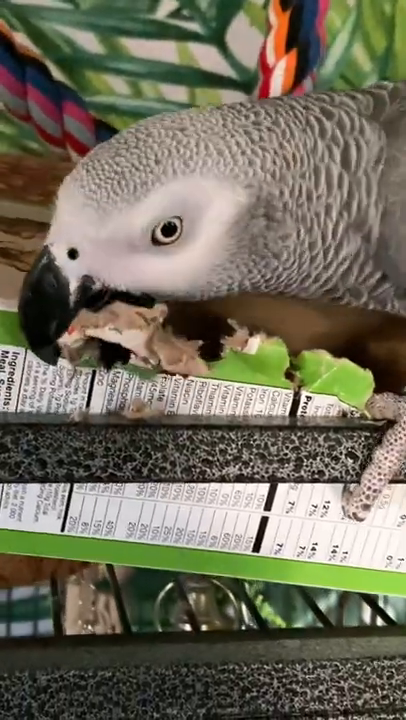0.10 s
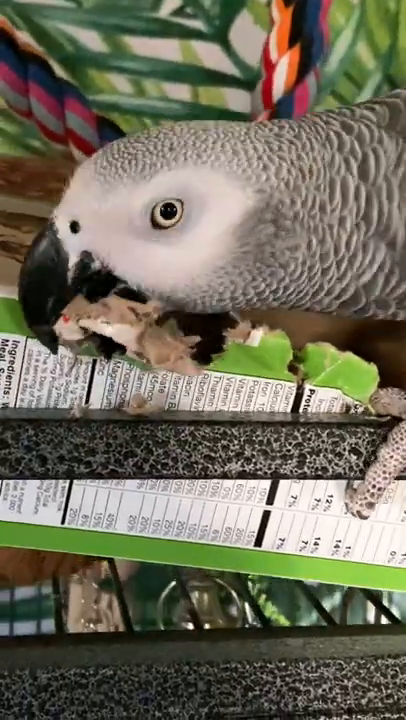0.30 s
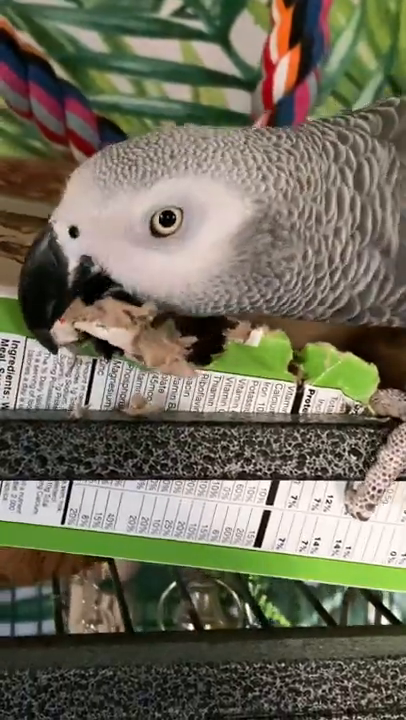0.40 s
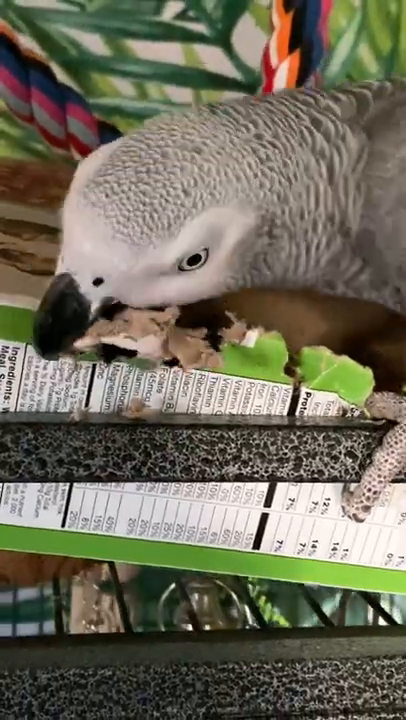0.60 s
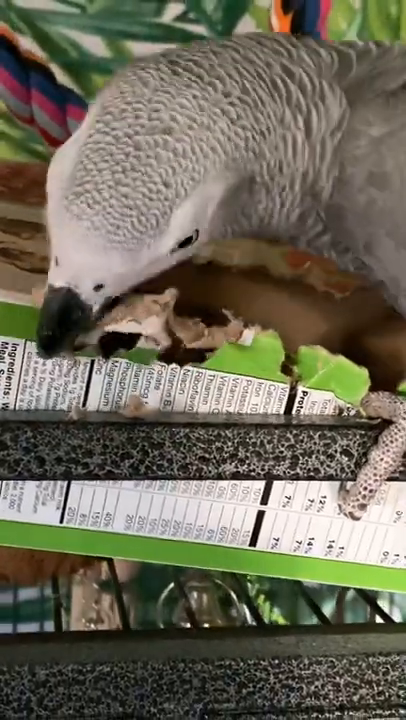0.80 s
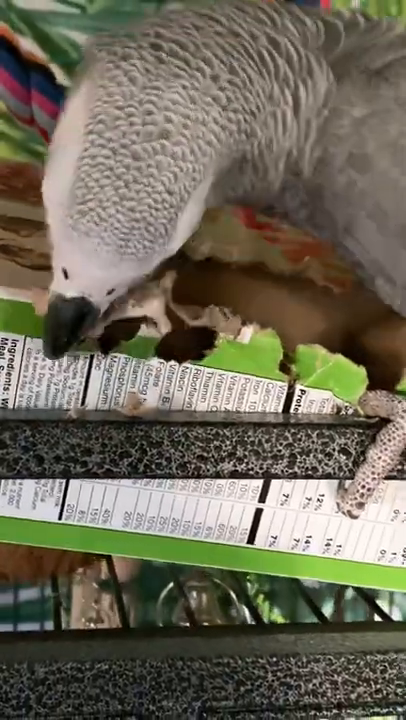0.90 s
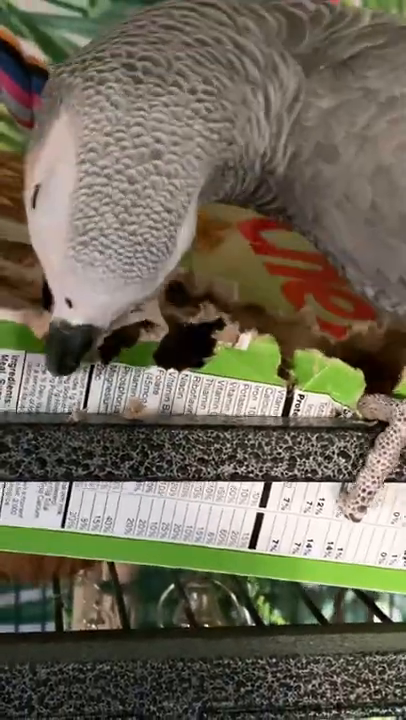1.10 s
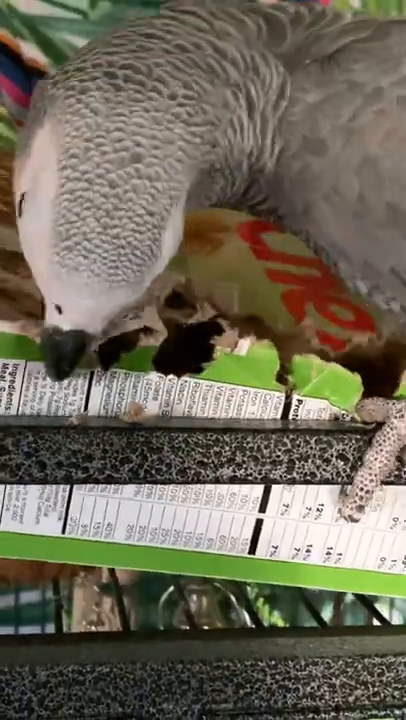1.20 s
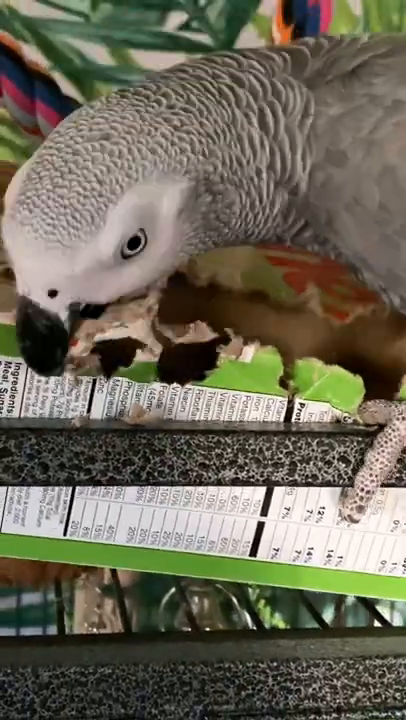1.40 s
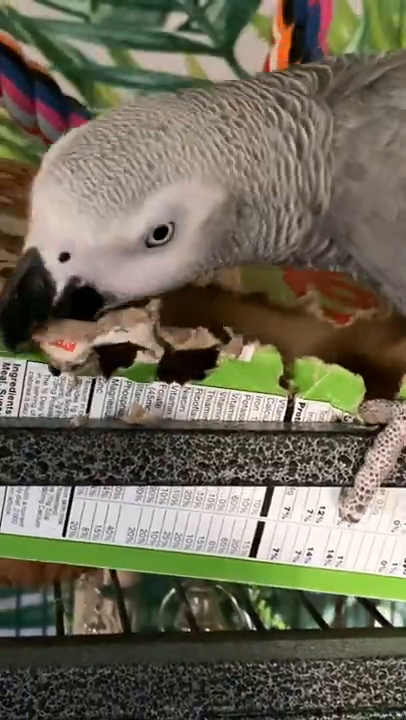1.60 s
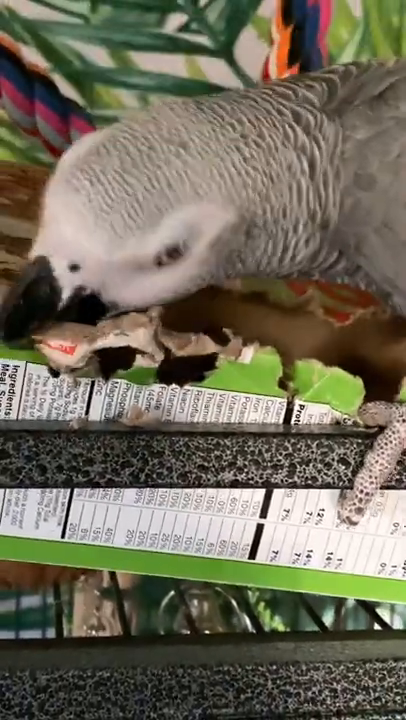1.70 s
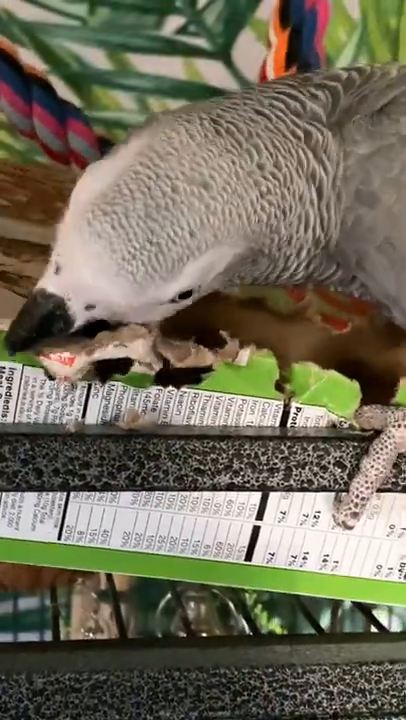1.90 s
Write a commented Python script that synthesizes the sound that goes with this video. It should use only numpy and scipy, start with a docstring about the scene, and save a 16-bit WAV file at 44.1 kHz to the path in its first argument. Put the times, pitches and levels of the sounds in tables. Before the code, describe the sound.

Two sharp parrot whistles sweep up and drop, while another bird squawks farther off.

```python
"""A parrot whistles, another bird squawks

A parrot whistles twice in a live room: a low held note swoops up three octaves, hovers, drops loudly.
Between and after the whistles another bird, farther off, squawks harshly.
A soft chirp leads into the first squawk. A beak nibbles faintly at cardboard, snapping its fibres.
Underneath are a low room rumble, a hum and a faint ring that dies away at the start."""
import sys
import numpy as np
from scipy import signal
from scipy.fft import rfft, irfft
from scipy.io import wavfile
from scipy.ndimage import uniform_filter1d, minimum_filter1d

SR = 44100
rng = np.random.default_rng(int(sys.argv[2]) if len(sys.argv) > 2 else 0)


def int16_out(signal):
    """Quantize to a 16-bit WAV file."""
    q = np.round(np.clip(np.atleast_2d(signal).T, -1, 1) * 32767)
    wavfile.write(sys.argv[1], SR, q.astype(np.int16))


N = 83790
T = np.arange(N) / SR
CUTOFF_HZ = 15850


def from_db(db):
    """Turn decibels into a number to multiply by."""
    return 10 ** (np.asarray(db) / 20)


def unit_power(x):
    """Scale a sound so its average power is 1."""
    return x / np.sqrt(np.mean(x ** 2) + 1e-20)


def at_hz(points, hz):
    """Look up a table by frequency, giving every octave equal space."""
    freqs, values = np.transpose(points)
    return np.interp(np.log(np.maximum(hz, 1)), np.log(freqs), values)


def colour(x, spectrum):
    """Give a sound the tone of a (frequency, level) table, at power 1."""
    gains = from_db(at_hz(spectrum, np.fft.rfftfreq(N, 1 / SR)))
    return unit_power(irfft(rfft(x) * gains, N))


def drift(hz):
    """A smooth random wobble of typical size 1; higher hz wobbles faster."""
    pole = np.exp(-2 * np.pi * hz / SR)
    return unit_power(signal.lfilter([1], [1, -2 * pole, pole * pole], rng.standard_normal(2 * N))[N:])


def phase_of(hz):
    """Add up a changing pitch into the angle of its wave."""
    return 2 * np.pi * np.cumsum(hz) / SR


# Tone of the room's rumble: (frequency [Hz], level [dB])
RUMBLE_TONE = [(20, -9.5), (32, -11), (48, 0.5), (70, -7), (120, -8), (200, -15), (400, -15), (1000, -27.5),
               (2500, -34.5), (6000, -37.5), (12000, -38.5), (16000, -28.5)]
def rumble(level_db=-61.5):
    """Steady, deep noise in the room."""
    return from_db(level_db) * colour(rng.standard_normal(N), RUMBLE_TONE)


# How the hum swells and sinks: (time [s], level [dB])
HUM_LEVELS = [(0, -58.5), (.1, -64), (.22, -52.5), (.33, -65), (1.3, -73), (1.68, -63.5), (1.9, -66)]
def hum(hz=99, waver_hz=3):
    """One low note that wavers slowly."""
    level = from_db(np.interp(T, *np.transpose(HUM_LEVELS)))
    return level * np.sin(phase_of(hz + waver_hz * drift(6.3)))


# Tone of the opening ring: (frequency [Hz], level [dB])
RING_TONE = [(400, -25), (800, 4.5), (1200, 1.5), (1650, 11.5), (2300, 6.5), (3200, -1.5), (5000, -13),
             (12000, -37)]
def dying_ring(start_db=-61, fall_db_per_s=45.5):
    """A faint, noisy ring dies away in the room."""
    return from_db(start_db - fall_db_per_s * T) * colour(rng.standard_normal(N), RING_TONE)


def overtone(phase, multiple):
    """A higher copy of a note, made hoarse by a fast wobble."""
    return np.sin(multiple * phase + 0.8 * drift(400))


# The whistle's swoop up and down; roughness 0 is smooth:
# (time from the top [s], pitch [Hz], level [dB], roughness [factor], overtone level [dB])
SWOOP_PATH = [(-.131, 735, -41, .5, -27), (-.120, 980, -21.5, .6, -34.5), (-.108, 1500, -27.5, .5, -39),
              (-.094, 2300, -31.5, .2, -35.5), (-.081, 3030, -18.5, .2, -34),
              (-.074, 3450, -11.5, .2, -19.5), (-.064, 4028, -10.5, .5, -34.5),
              (-.055, 5000, -14.5, 1.11, -11), (-.040, 5450, -8, .4, -4.5), (-.031, 5570, -8, .25, -22.5),
              (-.021, 5400, -5.5, .25, -26.5), (-.012, 5700, -9, 0.22, -22), (-.003, 5750, -4.5, .2, -40),
              (.003, 5532, -0.5, 0.02, -16.5), (0.014, 4942, -1, .1, -24.5), (0.021, 4242, -2, 0.2, -23),
              (0.032, 3695, -9, 0.3, -15.5), (.043, 3240, -15, 0.3, -33.5),
              (0.054, 3117, -44.5, 0.1, -33.5)]
def whistle_note(from_top, lead_age, lead_s, tuning):
    """A nearly pure tone: a swelling low lead-in, then the swoop, roughest as it nears the top."""
    fade_s, shimmer_db, jitter = 0.0026, 4, 0.042
    times, *columns = np.transpose(SWOOP_PATH)
    swoop_hz, db, rough, overtone_db = (np.interp(from_top, times, column) for column in columns)
    swoop_in = np.clip((from_top - times[0]) / fade_s, 0, 1)
    swoop_out = np.clip((times[-1] - from_top) / fade_s, 0, 1)
    swoop_level = from_db(db + shimmer_db * rough * drift(450)) * swoop_in * swoop_out
    lead_level = from_db(np.interp(lead_age, [0, lead_s], [-40.5, -22.5]))
    lead_level *= np.minimum(lead_age / fade_s, 1) * (1 - swoop_in)
    lead_hz = 741 + (590 - 741) * np.exp(-lead_age / 0.016)  # slides up, then holds
    hz = tuning * np.where(from_top < times[0], lead_hz, swoop_hz)
    phase = phase_of(hz * (1 + jitter * rough * drift(450)))
    second = overtone(phase, 2)
    third = from_db(1.8 * db) * overtone(phase, 3)  # flares as the whistle gets louder
    lead = np.sin(phase) + from_db(-30) * overtone(phase, 5)
    swoop = np.sin(phase) + from_db(overtone_db) * (second + third)
    return np.sqrt(2) * (lead_level * lead + swoop_level * swoop)


# Tone of the whistle's breath: (frequency [Hz], level [dB])
BREATH_TONE = [(250, -17.5), (600, -10.5), (2500, -17.5), (3600, -21), (5000, -10.5), (6300, -1.5),
               (8300, -18.5), (10200, 1.5), (12300, -21.5), (14300, -4), (16000, -19.5)]
def breath(lead_age, length_s=0.1):
    """Air rushes along with the lead-in and the start of the climb."""
    swell = np.sin(np.pi * np.minimum(lead_age / length_s, 1))
    return from_db(-43.5) * swell * colour(rng.standard_normal(N), BREATH_TONE)


# Tone of the low puff and the overload hiss above it: (frequency [Hz], level [dB])
PUFF_AND_SPLATTER_TONE = [(100, -19), (200, 5.5), (450, 2), (1000, -2.5), (3000, 3), (6500, -13),
                          (9000, -5), (12500, -8), (15500, 10)]
def puff_and_splatter(from_top, delay_s=0.012, width_s=0.017):
    """A low puff and a splatter of overload hiss on the loud drop, made as one burst of noise."""
    swell = np.exp(-((from_top - delay_s) / width_s) ** 2)
    return from_db(-23) * swell * colour(rng.standard_normal(N), PUFF_AND_SPLATTER_TONE)


# The two whistles: (time of the top [s], lead-in length [s], level [dB], tuning [ratio])
WHISTLE_CALLS = [(.272, .046, -13.5, 1.002), (1.428, 0.047, -13, .997)]
def whistle(top, lead_s, level_db, tuning):
    """One whole whistle: the note and breath, with a low puff and overload hiss on the drop."""
    from_top = T - top
    lead_age = np.maximum(from_top - SWOOP_PATH[0][0] + lead_s, 0)  # seconds since the lead-in began
    note = whistle_note(from_top, lead_age, lead_s, tuning)
    return from_db(level_db) * (note + breath(lead_age) + puff_and_splatter(from_top))


# The chirp's rise: (time [s], pitch [Hz], level [dB])
CHIRP_PATH = [(.307, 1283, -40), (0.323, 1392, -44), (0.372, 1477, -46.5), (.40, 1507, -45.5),
              (0.444, 1618, -51.5), (.47, 1610, -44)]
def chirp(jitter=0.04):
    """A soft, wavering, rising note."""
    times, hz, db = np.transpose(CHIRP_PATH)
    level = np.interp(T, times, from_db(db), left=0, right=0)
    pitch = np.interp(T, times, hz) * (1 + jitter * drift(200))
    return level * np.sin(phase_of(pitch))


# How strongly the farther bird's throat rings: (frequency [Hz], level [dB])
THROAT_TONE = [(300, -34), (550, -18.5), (800, -28.5), (1150, -16), (1450, -23), (2000, -11), (2500, -4.5),
               (2950, 1), (3600, -3.5), (4120, 1), (4370, 4), (4620, -1), (5150, 3), (5850, 0), (6500, -3),
               (7200, -0.5), (8000, -9.5), (10000, -5.5), (11500, -3), (13300, -20.5), (15800, -18.5)]
# The squawks: (start [s], time until fade-out [s], fade-in [s], pitch [Hz], slide [Hz/s], level [dB],
# roughness [0-1], boost of the lower tones [dB], throat tuning [ratio])
SQUAWK_CALLS = [(0.381, .150, 0.084, 1511, 342, -41, 0.83, 4.5, 0.99),
                (.626, 0.1, 0.038, 1413, 1199.5, -34, 0.66, 1, 1.02),
                (0.703, 0.07, 0.032, 1481, -200, -33, 0.42, 4.5, 1.013),
                (0.819, 0.1, 0.018, 1451, -450, -34.5, 0.5, 4.5, .98),
                (1.829, 0.1, 0.077, 574, 1011, -37, 0.5, 13.5, 0.99)]
def squawk(start, length, attack, hz, slide, level_db, rough, boost_db, tuning):
    """Unsteady pulses, each with a puff of air, pass through the farther bird's throat."""
    fade_out_s, jitter, shimmer_db = 0.035, 0.055, 1.5
    age = T - start
    pitch = hz + slide * np.clip(age, 0, length)
    phase = phase_of(pitch * (1 + jitter * rough * drift(500)))
    pulses = sum(np.cos(k * phase) for k in range(1, int(CUTOFF_HZ / hz)))
    pulses = unit_power(pulses * from_db(shimmer_db * drift(120)))
    air = unit_power(rng.standard_normal(N) * (1 + np.cos(phase)))
    rasp = np.sqrt(1 - rough) * pulses + from_db(-3) * np.sqrt(rough) * air
    boost = [(1840, boost_db), (3170, 0)]
    throat = [(freq * tuning, db + at_hz(boost, freq)) for freq, db in THROAT_TONE]
    swell = np.clip(age / attack, 0, 1) * np.clip(1 - (age - length) / fade_out_s, 0, 1)
    return from_db(level_db + drift(65)) * swell * colour(rasp, throat)


# Beak nibbles and nudges on cardboard: (start [s], level [dB], rough pitch of the crunch [Hz])
BEAK_NIBBLES = [(1, -56.5, 587), (1.107, -57.5, 1880), (1.767, -78.5, 1657)]
def nibble(start, level_db, hz, snaps_per_s=1580, rise_s=0.0065):
    """Cardboard fibres snap in a short, dying burst."""
    snaps = rng.standard_normal(N) * (rng.random(N) < snaps_per_s / SR)
    band = signal.butter(2, [hz / 2.75, hz * 1.27], "band", fs=SR, output="sos")
    crunch = unit_power(signal.sosfilt(band, snaps + 1e-18))
    progress = np.maximum(T - start, 0) / rise_s  # loudest at 1
    return from_db(level_db) * crunch * progress * np.exp(1 - progress)


# Tone of the room's echoes: (frequency [Hz], level [dB])
ECHO_TONE = [(300, -12.5), (600, 4.5), (950, 2), (1500, -3.5), (2400, 0.5), (3800, -2.5), (6000, -1),
             (10000, -5.5), (15000, 6.5)]
# How long the echoes last: (frequency [Hz], time to fall by 60 dB [s])
ECHO_TIMES = [(400, 0.22), (1200, 0.77), (3000, 0.41), (5000, 0.39), (9000, 0.39), (15000, 0.11)]
def room(sound, echo_db, gap_s=0.001, build_s=0.0033):
    """The direct sound plus a blur of echoes; each frequency band dies at its own speed."""
    edges = np.geomspace(150, 17000, 11)
    noise = rng.standard_normal((2, N))
    tail = np.zeros(N)
    for k, (low, high) in enumerate(zip(edges, edges[1:])):
        middle_hz = np.sqrt(low * high)
        band = signal.butter(2, [low, high], "band", fs=SR, output="sos")
        db = at_hz(ECHO_TONE, middle_hz) - 60 * T / at_hz(ECHO_TIMES, middle_hz)
        tail += from_db(db) * signal.sosfilt(band, noise[k % 2])
    tail *= np.clip((T - gap_s) / build_s, 0, 1)
    tail /= np.sqrt(np.sum(tail ** 2))
    return sound + from_db(echo_db) * signal.fftconvolve(sound, tail)[:N]


def scene():
    """Near whistles and nibbles share the room with a farther chirp and squawks."""
    near = sum(whistle(*row) for row in WHISTLE_CALLS) + sum(nibble(*row) for row in BEAK_NIBBLES)
    far = sum(squawk(*row) for row in SQUAWK_CALLS) + chirp()
    mix = room(near, echo_db=-3) + room(far, echo_db=-2) + rumble() + hum() + dying_ring()
    return mix[None]


def record(dry):
    """A fast limiter turns down the loudest peaks, then the very highest treble is cut."""
    ceiling, window = 0.43, 89  # the window is about 2 ms
    gain = np.minimum(1, ceiling / (np.abs(dry) + 1e-9))
    gain = uniform_filter1d(minimum_filter1d(gain, size=window), size=window)
    treble_cut = signal.ellip(12, 0.1, 80, CUTOFF_HZ, fs=SR, output="sos")
    return signal.sosfilt(treble_cut, dry * gain)


dry = scene()
out = record(dry)
int16_out(out)
```